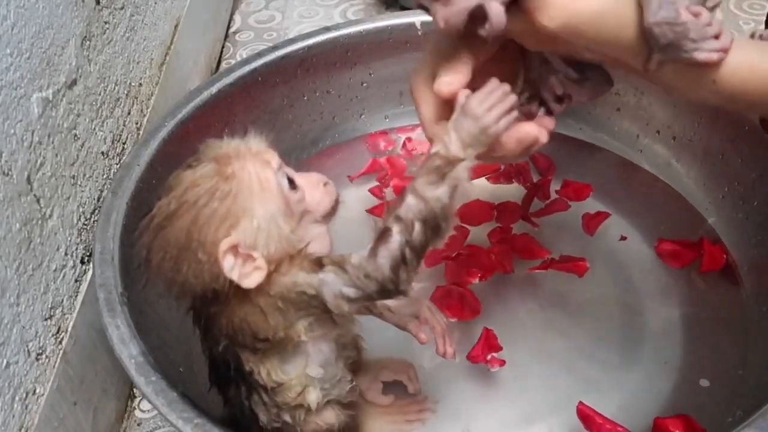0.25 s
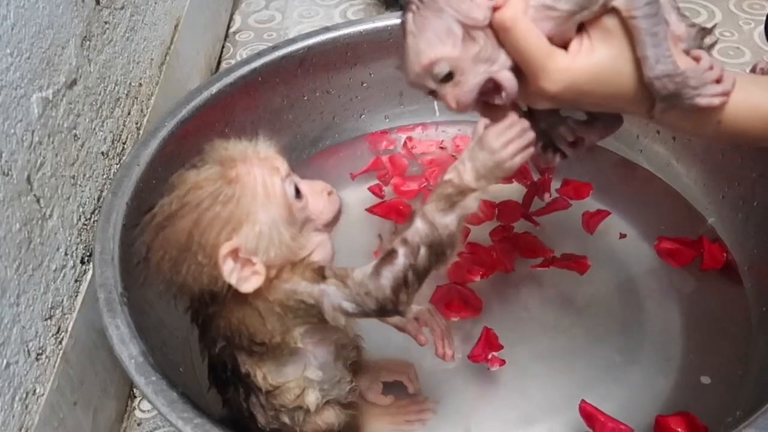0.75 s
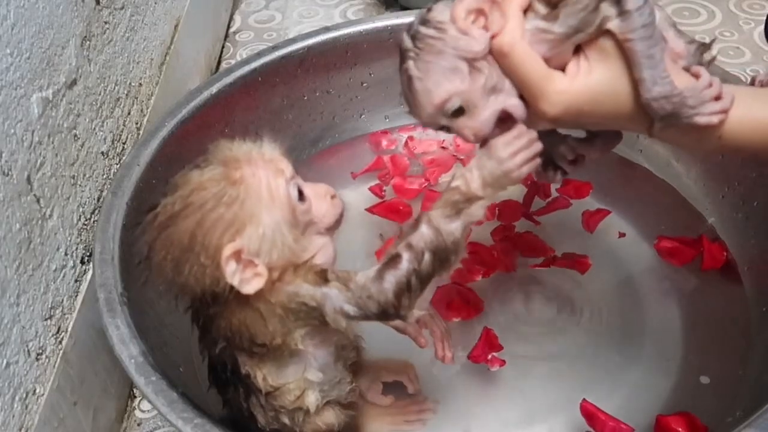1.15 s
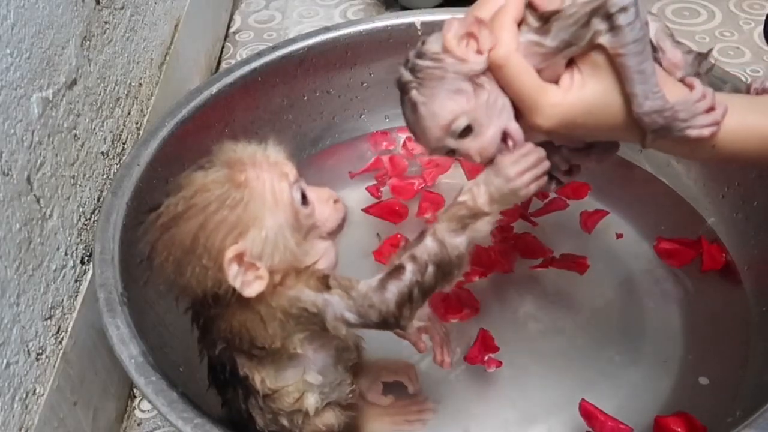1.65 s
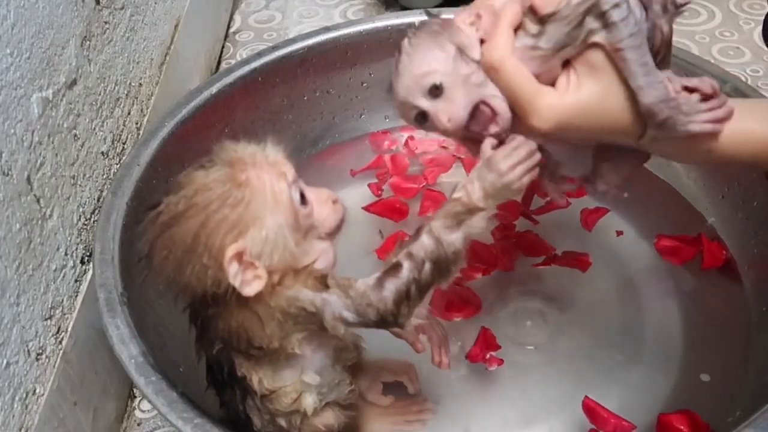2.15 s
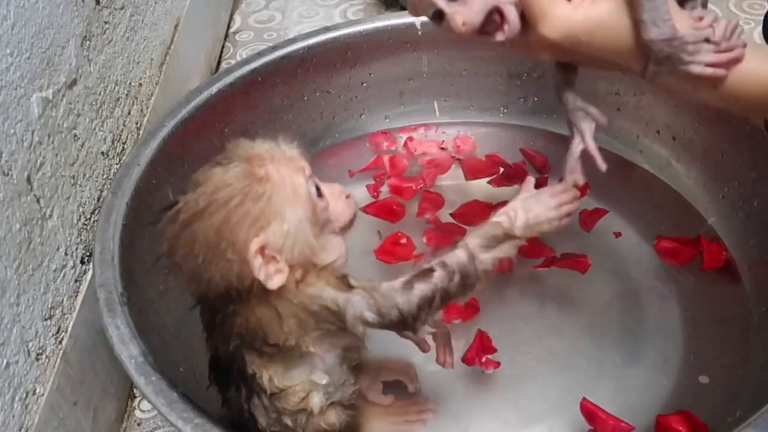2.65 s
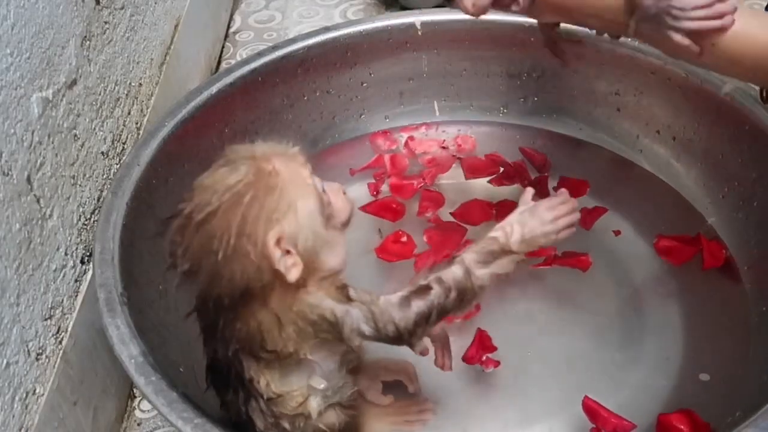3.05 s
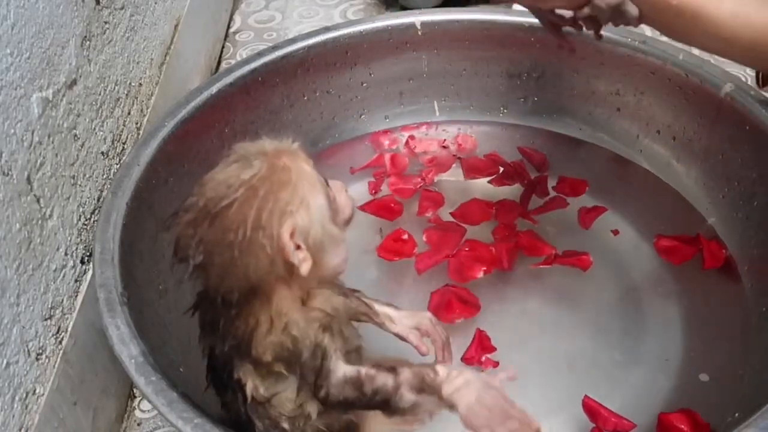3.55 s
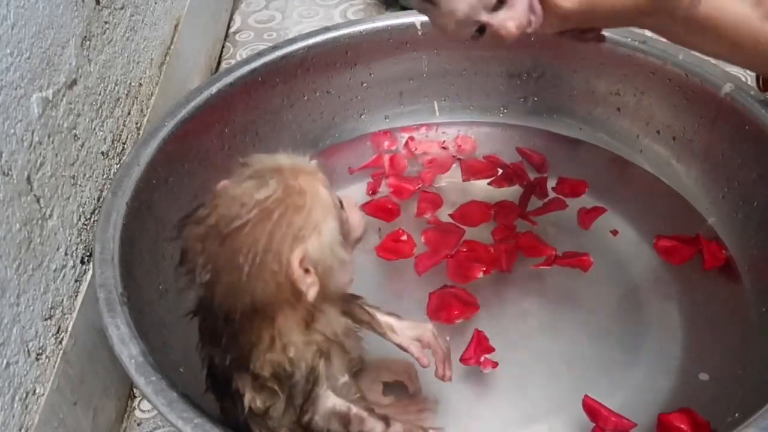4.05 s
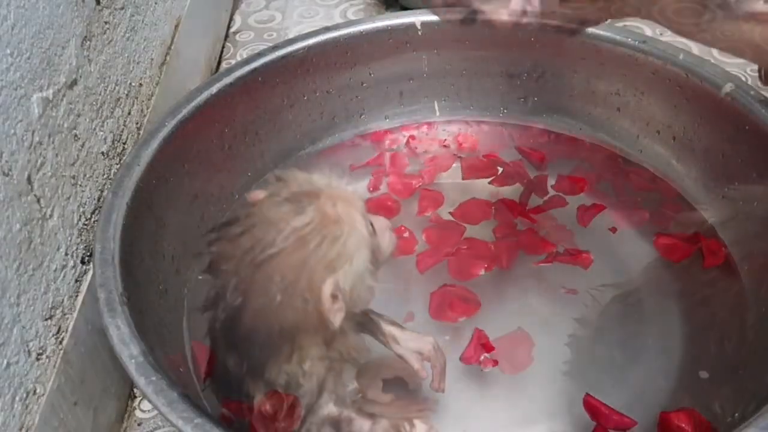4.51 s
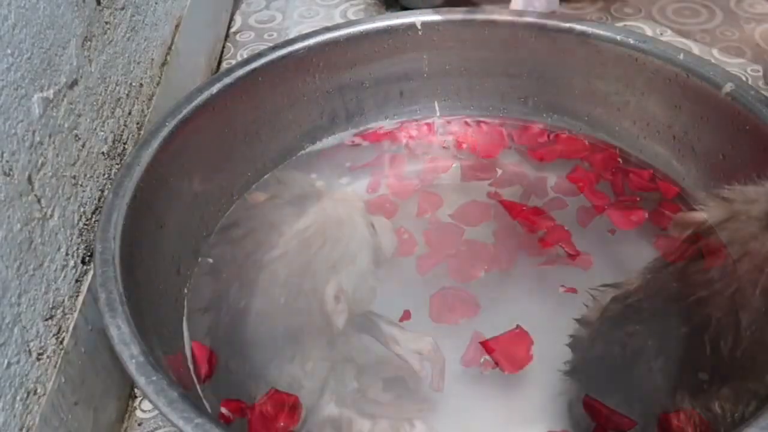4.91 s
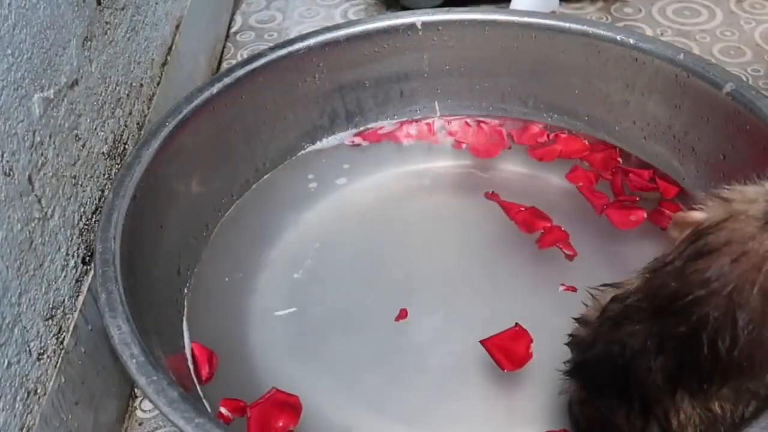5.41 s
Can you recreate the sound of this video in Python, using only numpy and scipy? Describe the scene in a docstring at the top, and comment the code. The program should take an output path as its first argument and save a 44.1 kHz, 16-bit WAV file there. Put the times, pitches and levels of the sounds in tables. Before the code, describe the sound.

Close phone pickup of an infant monkey's screams over a metal wash basin in a hard room. Sharp sliding squeals break into gritty rasps, pause, then return in a denser middle run with pulsing cries and airy high whistles. The background drops away under the cries, then rises as a low rumble with hiss and a few small clicks after the final weaker screech.

```python
"""Room rumble, moving air and hiss open loud; a baby monkey then screeches close to a phone.
Over a metal wash basin in a hard-walled home, squeals mix with rasps from chaotic vocal folds.
Steady fold pulses sound in several cries from early on; thin whistles join from mid-scene; small
ticks fall early and late. The background sinks, then swells back at the end. Filtered noise makes rasp
and background, sines the rest; two microphone ports hear the voice and room out of phase in the treble."""
import sys
import numpy as np
from scipy import signal
from scipy.fft import rfft, irfft, next_fast_len
from scipy.io import wavfile
from scipy.ndimage import uniform_filter1d, minimum_filter1d, map_coordinates

SR = 44100
rng = np.random.default_rng(int(sys.argv[2]) if len(sys.argv) > 2 else 0)


def waveform_to_disk(signal):
    """Save audio, clipped to [-1, 1], as 16-bit WAV at the path in sys.argv[1]."""
    frames = np.transpose(np.atleast_2d(signal))
    scaled = np.clip(frames, -1, 1) * 32767
    samples = np.round(scaled).astype(np.int16)
    wavfile.write(sys.argv[1], SR, samples)


N = 250276
TOP_HZ = 15900  # band limit of the sound


def amp(db):
    """Decibels to linear gain."""
    return 10 ** (np.asarray(db) / 20)


def unit(x):
    """Scale to an RMS of one."""
    return x / np.sqrt(np.mean(x ** 2) + 1e-20)


def along(points, hz):
    """Read (frequency, value) points on a log frequency axis."""
    f, v = np.transpose(points)
    return np.interp(np.log(hz + 1), np.log(f + 1), v)


def curves(rows, t):
    """Each column after the time, read at the times t."""
    s, *columns = np.transpose(rows)
    return [np.interp(t, s, column) for column in columns]


def wobble(rate):
    """A smooth random curve with rate knots a second."""
    return map_coordinates(rng.standard_normal(N // 40), [np.arange(N) * rate / SR])


def filtered(x, response):
    """x times a complex response of frequency."""
    m = next_fast_len(N + SR // 2)
    return irfft(rfft(x, m) * response(np.fft.rfftfreq(m, 1 / SR)), m)[..., :N]


def stroke(rows, fade):
    """Samples, times and soft edges of one stroke; fade in seconds."""
    i = np.arange(round(rows[0][0] * SR), round(rows[-1][0] * SR))
    edge = np.minimum(i - i[0], i[-1] - i) / (fade * SR)
    return i, i / SR, np.clip(edge, 0, 1)


# held squeals of the taut folds, one list a squeal: time_s, pitch_hz, level_db, roughness (0-1)
HELD_SQUEALS = [
    [(0.311, 4057, -34.5, 0), (0.32, 3653, 0.5, .05), (0.329, 3492, -8.5, 0.2), (0.345, 3330, -13, .2),
     (0.38, 3203, -16, .6), (0.4, 2800, -17.5, .8), (0.43, 2428, -16.5, 0.5)],
    [(0.72, 5220, -28, 0.3), (0.733, 5010, -10.5, 0.1), (0.745, 4480, -13, .2), (0.768, 4610, -18, .3)],
    [(1.819, 4087, -23.5, 0.1), (1.84, 3527, -11, .1), (1.865, 3390, -18.5, 0), (1.878, 3683, -9, 0.2),
     (1.9, 3787, -12.5, .3), (1.92, 3510, -22, .5), (1.94, 4160, -13, .3), (1.958, 4787, -13, .3),
     (1.978, 4844, -18.5, 0)],
    [(4.435, 5153, -38, 0.4), (4.465, 4630, -19, .2), (4.49, 4270, -20.5, 0.4), (4.51, 3850, -20.5, 0.3),
     (4.53, 3684, -29, 0.07)],
]
OCTAVE_DB, OCTAVE_LOSS_DB = -6, 65  # octave of a clean held squeal, and its loss at full roughness


def held_squeals():
    """Held squeals; the octave weakens as the folds roughen."""
    return [[(s, hz, db, OCTAVE_DB - OCTAVE_LOSS_DB * rough, rough) for s, hz, db, rough in rows]
            for rows in HELD_SQUEALS]


# short glides inside the screeches, some of them overtones of a lower pitch:
# start_s, length_s, first_hz, last_hz, peak_db, octave_db (over the tone), roughness (0-1)
TONE_GLIDES = [ (0.325, 0.072, 2200, 2307, -27.5, -21, 0.14), (0.346, .04, 2867, 2654, -17.5, -24.5, 0.3),
               (0.381, 0.051, 1887, 920, -33, -20.5, 0.36), (0.42, 0.046, 3250, 2845, -22.5, -20.5, 0.16),
               (0.737, 0.046, 2927, 1828, -25.5, -2, 0.31), (0.776, 0.072, 3950, 3700, -22.5, -31.5, 0.25),
               (0.782, 0.032, 5640, 5500, -21.5, -43, 0.12), (.81, 0.085, 3243, 3056, -24.5, -8, 0.17),
               (0.809, 0.069, 4600, 4720, -21.5, -38, 0.26), (0.817, 0.076, 1578, 1512, -35.5, -13, 0.28),
               (2.158, 0.015, 6980, 7270, -21, -14.5, .3), (2.174, .04, 3498, 2790, -17, -10.5, 0.42),
               (2.214, 0.072, 2662, 3394, -25.5, 1.5, 0.54), (2.175, 0.027, 5900, 5730, -12.5, -34.5, 0.12),
               (2.182, 0.038, 4495, 4680, -18, -19, 0.42), (2.256, 0.011, 4430, 4350, -25, -33, 0.1),
               (2.545, 0.088, 4210, 4250, -41.5, -4, 0.23), (2.737, 0.019, 7110, 5140, -13.5, -38, 0.14),
               (3.8, .02, 6400, 7200, -25, -3, 0.16), (3.818, 0.082, 8290, 8390, -18.5, -59, 0.2),
               (3.883, 0.045, 3253, 2507, -23, 0.5, 0.48), (3.936, 0.02, 2476, 3410, -23.5, 1, 0.2),
               (3.994, 0.062, 3560, 2793, -23.5, 2, 0.4), (4.051, 0.024, 5120, 4975, -21.5, -30, 0.08),
               (4.317, 0.047, 3898, 4940, -28.5, -16, 0.36), (4.321, 0.056, 8400, 12200, -42.5, -53.5, 0.6),
               (4.394, .045, 6250, 5640, -26.5, -39.5, 0.26), (4.479, 0.056, 2454, 1787, -34.5, -3, 0.42),
               (4.539, 0.025, 1850, 3027, -32.5, -3.5, 0.36), (4.54, 0.0184, 4030, 4530, -26.5, -46, 0.2),
               (4.515, .03, 5700, 3840, -31, -42, 0.3), (4.529, 0.02, 3716, 2163, -30.5, -16, 0.06),
               (4.401, .035, 5683, 3900, -40, -30, 0.3), (4.46, .035, 3300, 2520, -26, -15, 0),
               (4.808, .03, 3654, 5000, -53, -40, 0.01), (5.006, .065, 2926, 2210, -34.5, 3, .25),
               (1.894, .05, 2077, 2310, -28.5, -14, 0.32), (3.866, .035, 4406, 3200, -25.5, -18.5, 0.1),
               (4.799, 0.055, 1410, 3300, -46, -18, 0), (4.852, 0.019, 3700, 5390, -39.5, -34, 0.2),
               (4.955, 0.052, 4050, 3660, -30.5, -29, 0.28), (4.955, 0.06, 5780, 5220, -31, -39, .1),
               (5.038, 0.051, 4570, 3615, -30.5, -31.5, 0), ]
CREST, EARLY = .4, 0.4  # a glide peaks this far in, with this share of its frequency change done
RISE_DB, FALL_DB = 1, 7  # how much softer it starts and ends


def glides():
    """Sliding squeal tones, some overtones of a lower pitch, swelling to a crest and falling away."""
    out = []
    for s, length, first, last, db, over_db, rough in TONE_GLIDES:
        crest_hz = first + EARLY * (last - first)
        out.append([
            (s, first, db - RISE_DB, over_db, rough),
            (s + CREST * length, crest_hz, db, over_db, rough),
            (s + length, last, db - FALL_DB, over_db, rough),
        ])
    return out


# thin breathy whistles near the top of hearing, one list a whistle: time_s, pitch_hz, level_db
THIN_WHISTLES = [
    [(2.27, 11470, -39), (2.33, 12380, -34), (2.37, 13750, -27), (2.4, 14560, -30.5), (2.44, 13260, -25.5),
     (2.48, 12820, -32.5), (2.53, 13930, -21), (2.575, 12400, -38)],
    [(2.6, 11400, -36), (2.65, 12700, -31), (2.7, 12730, -30), (2.74, 11940, -37)],
    [(3.19, 11900, -74), (3.24, 13680, -28.5), (3.3, 12470, -38), (3.385, 12900, -22)],
    [(3.435, 11670, -19.5), (3.47, 13180, -30), (3.5, 13400, -27), (3.54, 10980, -28)],
]


def thin_whistles():
    """Very high pitches at full roughness, with almost no octave."""
    no_octave_db, rough = -60, 1
    return [[(*row, no_octave_db, rough) for row in rows] for rows in THIN_WHISTLES]


def squeal():
    """A taut fold edge whistles; roughness shakes its pitch and strength."""
    out, shake, flutter = np.zeros(N), wobble(600), wobble(300)
    for rows in held_squeals() + glides() + thin_whistles():
        i, t, edge = stroke(rows, fade=0.0029)
        hz, db, over_db, rough = curves(rows, t)
        rough = np.clip(rough, .04, 1)  # even a clean squeal is slightly unsteady
        turn = 2 * np.pi * np.cumsum(hz * (1 + .055 * rough * shake[i])) / SR
        size = np.abs(1 + (.1 + 1.5 * rough) * flutter[i]) / np.sqrt(1 + rough ** 2)
        tone = np.sin(turn) + amp(over_db) * np.sin(2 * turn) * (2 * hz < TOP_HZ)
        # higher overtones follow the octave up to a ceiling and fade as the voice roughens
        upper_db = np.minimum(over_db, -12) - 10
        tone += amp(upper_db - 70 * rough) * np.sin(3 * turn) * (3 * hz < TOP_HZ)
        tone += amp(upper_db - 100 * rough) * np.sin(4 * turn) * (4 * hz < TOP_HZ)
        out[i] += np.sqrt(2) * amp(db) * edge * size * tone
    return out


# steady fold pulses, one list a run: time_s, pitch_hz, level_db
FOLD_PULSES = [
    [(.77, 583.7, -25), (.8, 553, -29.5), (.822, 567, -33.5)],
    [(2.995, 931.5, -50), (3.01, 930.4, -15), (3.04, 888.6, -23), (3.07, 995, -31.5), (3.09, 877.5, -20.5),
     (3.107, 816, -14.5), (3.125, 899, -49), (3.15, 949, -22.5), (3.19, 945, -43)],
    [(3.82, 846, -40), (3.836, 796, -44.5), (3.86, 897, -37), (3.89, 805, -41)],
    [(4.294, 937, -57.5), (4.305, 1308, -47.5), (4.322, 2000, -32)],
    [(4.955, 2060, -54), (5.003, 1825, -56)],
    [(3.19, 1170, -47), (3.22, 1093, -46)],
    [(5.07, 997, -36), (5.084, 999, -40), (5.1, 943, -57)],
]
# colour of the fold pulses: frequency_hz, relative_db
CRY_COLOUR = [(400, -19.5), (900, -16), (2000, -7.5), (3200, -19.5), (4500, -1), (6000, 10.5), (8000, 8),
              (10000, -25), (15000, -24.5)]
TILT_DB, TILT_PER_DB = 2.5, 0.18  # brightness in dB per octave at level 0 dB; softer pulses are duller
UNEVEN_DB, UNEVEN_S = 3, .035  # each overtone swells on its own: depth and smoothing time


def folds():
    """Regular fold pulses hold every multiple of the pitch; also returns bare pulses and their gate."""
    out, bare, voiced = np.zeros((3, N))
    shake, flutter = wobble(200), wobble(90)
    k = np.arange(1, 28)[:, None]  # multiples of the pitch
    for rows in FOLD_PULSES:
        i, t, edge = stroke(rows, fade=.004)
        hz, db = curves(rows, t)
        tilt_db = TILT_DB + TILT_PER_DB * db
        turn = 2 * np.pi * np.cumsum(hz * (1 + .009 * shake[i])) / SR
        partials = np.sin(k * turn + k * k) * (k * hz < TOP_HZ)
        noise = rng.standard_normal(partials.shape)
        uneven = unit(uniform_filter1d(noise, size=round(UNEVEN_S * SR), axis=1))
        partials *= unit(amp(UNEVEN_DB * uneven))
        strength = amp(along(CRY_COLOUR, k * hz) + tilt_db * np.log2(k))
        loudness = np.sqrt(np.sum(strength ** 2, axis=0) / 2)
        pulses = np.sum(strength * partials, axis=0) / loudness
        out[i] += amp(db + 4.4 * flutter[i]) * edge * pulses
        bare[i] = np.sum(partials, axis=0) * np.sqrt(4 * hz / SR)  # as dense as unit white noise
        voiced[i] = edge
    return out, bare, voiced


# rasping screeches, one list a screech:
# time_s, effort_db, mouth_hz (resonance), throat_db (over the mouth), treble_db (over the mouth)
RASP_SCREECHES = [
    [(0.3, -56, 4080, 7.5, -18), (0.314, -27, 3970, -3, -9), (0.322, -30, 3950, 14.5, 5),
     (0.332, -39.5, 4110, 21, -8), (0.368, -26.5, 4400, -3, -7.5), (0.382, -22, 4600, 10.5, -21),
     (0.444, -52, 4400, 22.5, -19.5), (0.472, -45.5, 4820, 12, -18.5), (0.5, -57.5, 4740, 4.5, -12.5)],
    [(0.715, -57.5, 4870, -20, -11.5), (0.723, -28, 5130, -29, -23.5), (0.735, -16, 5100, -32.5, -38.5),
     (0.745, -18, 4800, -19.5, -15.5), (0.781, -21.5, 5100, 1.5, -16.5), (0.873, -20.5, 4500, -3.5, -25.5),
     (0.885, -26.5, 4640, 9.5, -15), (0.93, -58, 4260, 7.5, -17.5)],
    [(1.815, -38, 4020, -22.5, -29.5), (1.829, -33, 4290, -11.5, -0.5), (1.871, -51.5, 3930, 13, 3.5),
     (1.879, -26, 3900, 4, -14.5), (1.891, -32, 4130, -12, -13), (1.915, -31, 4120, 12, -7.5),
     (1.957, -18.5, 4660, -31, -26.5), (1.969, -32, 4620, -13.5, -53.5), (1.99, -46.5, 4800, -12, -33)],
    [(2.155, -35, 5750, -8.5, -6), (2.159, -23.5, 5370, -19.5, -2.5), (2.169, -28.5, 5300, -5.5, 3.5),
     (2.179, -13.5, 5100, -10.5, -9), (2.199, -15, 5240, -11, -20.5), (2.219, -22.5, 4930, -10, -4),
     (2.251, -20.5, 4530, -3, -14.5), (2.283, -27, 5000, -17.5, 0), (2.4, -46.5, 4840, -3, -17)],
    [(2.39, -53.5, 4560, -6.5, 1), (2.47, -40.5, 4700, -6, 0), (2.524, -48, 4600, -6.5, -2.5),
     (2.578, -31, 4540, -8, -3), (2.652, -49, 5430, -6, 2), (2.722, -35.5, 5500, -4, -5),
     (2.74, -25.5, 5660, -29, 2.5), (2.744, -26.5, 5720, -38.5, 1), (2.79, -45, 5720, -17.5, -4.5)],
    [(2.955, -41.5, 5220, -15, -5), (2.963, -33.5, 5350, -1, 11), (2.997, -24.5, 5330, -25, 4.5),
     (3.025, -31, 4730, -15.5, 15.5), (3.035, -22, 5200, -25, 8), (3.099, -17.5, 5530, -10, -6),
     (3.181, -33, 5740, -14, 16), (3.227, -34, 4270, -12.5, -2), (3.3, -45, 4660, 6.5, 8.5)],
    [(3.29, -47, 4800, 2.5, 7.5), (3.346, -38, 4400, -10.5, -0.5), (3.386, -35, 4850, -8.5, 3.5),
     (3.426, -17.5, 5500, -22.5, -8), (3.436, -29.5, 5160, -10.5, 3.5), (3.504, -51.5, 4770, -3, -4),
     (3.532, -22, 4700, -20, -2), (3.546, -17, 5040, -36.5, -2), (3.62, -49.5, 4910, -19, -5)],
    [(3.796, -41, 5390, -5, 13.5), (3.816, -21, 5440, -21, -1.5), (3.86, -25, 5160, -4, 9),
     (3.872, -16.5, 5000, -25, -6), (3.904, -16, 4670, -10, -20.5), (3.988, -22, 5570, -17.5, -12.5),
     (4.026, -22.5, 5000, -11, -23), (4.062, -19.5, 5310, -36.5, -7.5), (4.085, -40.5, 5350, -3.5, -16)],
    [(4.292, -55, 4250, 26.5, -30), (4.322, -38, 4150, -6.5, -4.5), (4.398, -30.5, 5300, -16, -7.5),
     (4.422, -20.5, 5200, -30, -5.5), (4.44, -11, 4950, -24, -14.5), (4.486, -21.5, 4700, -8.5, -36),
     (4.53, -40, 4590, 4, -39), (4.546, -26.5, 4400, -7, -37), (4.58, -53, 4280, 7, -5)],
    [(4.79, -56, 4130, 6.5, -21), (4.85, -64.5, 4140, 8, -36), (4.86, -42.5, 4140, -27, -21),
     (4.906, -65, 4320, -2, 4), (4.958, -36, 5200, -18.5, -4), (4.996, -20, 5080, -19.5, -13.5),
     (5.044, -27, 4500, -12, -18.5), (5.088, -43.5, 4300, 2.5, -43), (5.12, -62, 5110, -5, -26)],
]
THROAT_HZ, CHEST_DB, CHEST_FOLLOWS = 3084, -44.5, 0.73  # the chest follows the throat's level in part
SIZZLE_DB = -30  # against the treble


def rasp(bare, voiced):
    """Chaotic folds: noise in uneven bursts of a few milliseconds, shaped by moving resonances."""
    swell = 1.5 * wobble(45)
    bursts = unit(amp(2.5 * wobble(260) + swell) * rng.standard_normal(N))
    # while the folds beat evenly, they replace most of the noise
    share = .8 * voiced
    bursts = np.sqrt(1 - share) * bursts + np.sqrt(share) * bare
    gate = np.zeros(N)
    for rows in RASP_SCREECHES:
        i, _, edge = stroke(rows, fade=0.012)
        gate[i] = np.minimum(gate[i] + edge, 1)
    hz, t, z = signal.stft(bursts * gate, SR, nperseg=256)
    rows = sorted(map(tuple, np.vstack(RASP_SCREECHES)))
    mouth_db, mouth_hz, throat_over_db, treble_over_db = curves(rows, t)
    throat_db = mouth_db + throat_over_db
    treble_db = mouth_db + treble_over_db
    chest_db = CHEST_DB + CHEST_FOLLOWS * throat_db
    sizzle_db = treble_db + SIZZLE_DB
    bands = (  # centre_hz, width_hz, level_db
        (1250, 550, chest_db),
        (THROAT_HZ, 750, throat_db),
        (mouth_hz, 950, mouth_db),
        (7700, 1600, treble_db),
        (11500, 2300, sizzle_db),
    )
    power = np.zeros(z.shape)
    for centre, width, db in bands:
        # steep skirts keep the valleys dark
        peak = 1 / (1 + ((hz[:, None] - centre) / width) ** 2) ** 3 + 0 * t
        power += amp(db) ** 2 * peak / np.mean(peak, axis=0)
    # brief near-regular runs of the folds leave short tonal strands in the noise
    drift = unit(uniform_filter1d(rng.standard_normal(z.shape), size=8, axis=1))
    strands = unit(amp(4 * drift))
    return signal.istft(z * np.sqrt(power) * strands, SR, nperseg=256)[1][:N]


# small ticks and drips: start_s, level_db, pitch_hz, t60_s
TICKS_AND_DRIPS = [(1.35, -62, 3150, .12), (4.612, -42, 12000, .002), (5.397, -38, 2900, .06),
                   (5.405, -42, 5200, .02), (5.418, -34, 10000, .002), (5.43, -42, 10500, .002),
                   (5.565, -36, 10500, .002)]


def ticks():
    """Short damped pings, each with a puff of noise at the onset."""
    out, t = np.zeros(N + SR), np.arange(SR // 4) / SR
    for s, db, hz, t60 in TICKS_AND_DRIPS:
        puff = 0.24 * amp(-60 * t / 0.0037) * rng.standard_normal(len(t))
        ping = np.sin(2 * np.pi * hz * t) + puff
        out[round(s * SR):][:len(t)] += amp(db - 60 * t / t60) * ping
    return out[:N]


def echo(x, decay, delay):
    """A diffuse stereo answer, delay seconds late; each frequency dies at its own speed."""
    hz, t, z = signal.stft(rng.standard_normal((2, SR // 2)), SR, nperseg=128)
    fading = amp(-60 * t / along(decay, hz)[:, None])
    tail = signal.istft(z * fading, SR, nperseg=128)[1]
    late = np.pad(x, (round(delay * SR), 0))[None]
    return signal.fftconvolve(late, tail / np.linalg.norm(tail[0]), axes=1)[:, :N]


# phase between the two microphone ports: frequency_hz, phase_rad
PORT_PHASE = [(300, .15), (700, .3), (1400, 0.25), (2500, .25), (3500, .45), (4600, 1.05), (6800, 1.9),
              (9000, 2.7), (15000, 2.75)]


def ports(pair, alike):
    """Two signals made partly alike, then turned apart in phase as the ports hear them."""
    same, other = pair
    shared, opposed = alike * same, (1 - alike) * other
    mix = np.array([shared + opposed, shared - opposed])
    sides = np.array([[-1], [1]])
    return filtered(mix, lambda hz: np.exp(.5j * along(PORT_PHASE, hz) * sides))


# room tone levels: time_s, rumble_db, hiss_db
TONE_LEVELS = [(0, -45.5, -55.5), (.32, -43.5, -54.5), (0.359, -64.5, -60.5), (1.05, -67.5, -72.5),
               (1.8, -54.5, -67), (2.2, -62, -66.5), (2.45, -77, -68), (2.93, -64.5, -63.5),
               (3, -83, -70.5), (3.85, -73.5, -67), (3.9, -94, -94.5), (4.319, -85, -63),
               (4.399, -54.5, -80), (4.7, -47, -61), (5.15, -38, -54.5), (5.68, -38, -54.5)]
# colour of the rumble: frequency_hz, relative_db
RUMBLE_COLOUR = [(12, -40.5), (20, -9.5), (59, -2.5), (118, 0), (161, 0.5), (206, -2.5), (242, -8.5),
                 (300, -7), (390, -35.5), (660, -120)]
# colour of the moving air: frequency_hz, relative_db
AIR_COLOUR = [(120, -29.5), (200, -17.5), (376, -2.5), (465, -13), (758, -12), (831, -13.5), (1500, -23),
              (1950, -50), (3300, -120)]
# colour of the hiss: frequency_hz, relative_db
HISS_COLOUR = [(700, -25.5), (1500, 4), (3000, -0.5), (6000, -8.5), (10000, -15), (13000, -27.5),
               (15500, -32.5)]
# faint hums: start_s, end_s, pitch_hz, level_db
FAINT_HUMS = [(2.2, 3.95, 350, -70), (1.2, 3.9, 522, -80), (4.8, 5.68, 770, -64), (4.6, 5.68, 103, -48),
              (0, 2.4, 60, -68), (0, 2.4, 125, -67)]
AIR_SHARE = 0.44  # the air's level lies this far from hiss to rumble


def room_tone():
    """Filtered noise as rumble, moving air and hiss, each swelling on its own; a few hums waver."""
    t = np.arange(N) / SR
    out = np.zeros((2, N))
    rumble_db, hiss_db = curves(TONE_LEVELS, t)
    air_db = AIR_SHARE * rumble_db + (1 - AIR_SHARE) * hiss_db
    layers = (  # level_db, colour, likeness of the channels, sway_db
        (rumble_db, RUMBLE_COLOUR, .9, 2.2),
        (air_db, AIR_COLOUR, .85, 1.2),
        (hiss_db, HISS_COLOUR, .7, .6),
    )
    for db, colour, alike, sway_db in layers:
        noise = filtered(rng.standard_normal((2, N)), lambda hz: amp(along(colour, hz)))
        out += amp(db + sway_db * wobble(8.3)) * unit(ports(noise, alike))
    for start, end, hz, db in FAINT_HUMS:
        on = np.clip(np.minimum(t - start, end - t) / 0.2, 0, 1)
        turn = 2 * np.pi * np.cumsum(hz + 4 * wobble(13.0)) / SR
        out += np.sqrt(2) * amp(db + 3 * wobble(6.5)) * on * np.sin(turn)
    return out


# decay of the basin and near walls: frequency_hz, t60_s
BASIN_DECAY = [(500, 0.056), (4000, 0.18), (12000, 0.099)]
# decay of the room: frequency_hz, t60_s
ROOM_DECAY = [(500, 0.22), (2000, 0.29), (3300, 0.42), (6000, .35), (12000, .3)]
# stereo lean, ending leftward as the monkey is carried: time_s, left_over_right_db
STEREO_LEAN = [(0, 0), (2.8, 0), (3.2, -0.5), (4.2, -1.06), (5.1, 1)]


def scene():
    """Voice and ticks ring in the basin and room, over the room tone."""
    cry, bare, voiced = folds()
    voice = squeal() + cry + rasp(bare, voiced) + ticks()
    near = np.array([voice, 0 * voice]) + amp(-9) * echo(voice, BASIN_DECAY, delay=.001)
    far = amp(-21.5) * echo(voice, ROOM_DECAY, delay=0.005)
    lean_db, = curves(STEREO_LEAN, np.arange(N) / SR)
    lean = amp([lean_db / 2, -lean_db / 2])
    return lean * ports(near, alike=0.85) + ports(far, alike=.8) + room_tone()


def record(dry):
    """The extreme treble falls away, a limiter holds the peaks, and a band limit cuts the top."""
    dull = filtered(dry, lambda hz: 1 / (1 + (hz / 15300) ** 12))
    needed = np.minimum(1, .97 / (np.abs(dull).max(axis=0) + 1e-9))
    gain = uniform_filter1d(minimum_filter1d(needed, size=129), size=64)
    return filtered(dull * gain, lambda hz: hz < TOP_HZ)


dry = scene()
out = record(dry)
waveform_to_disk(out)
```